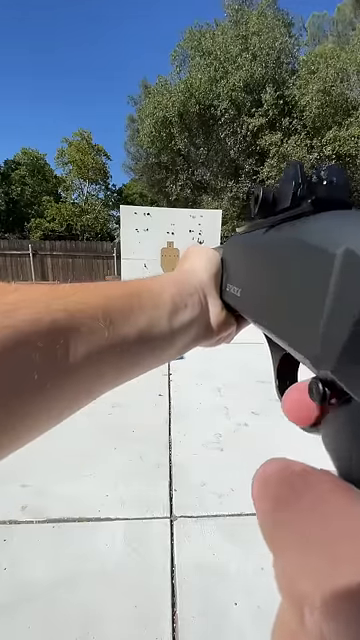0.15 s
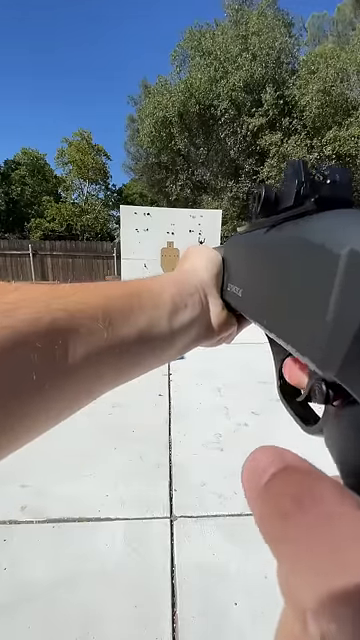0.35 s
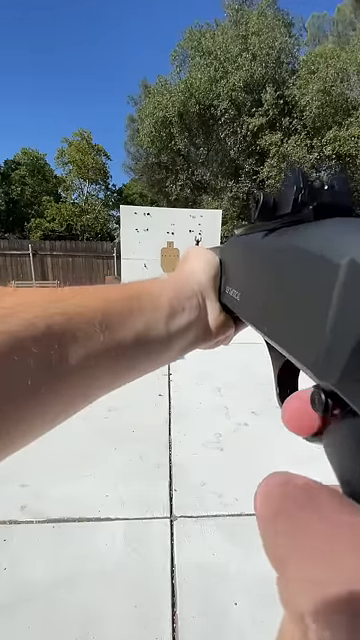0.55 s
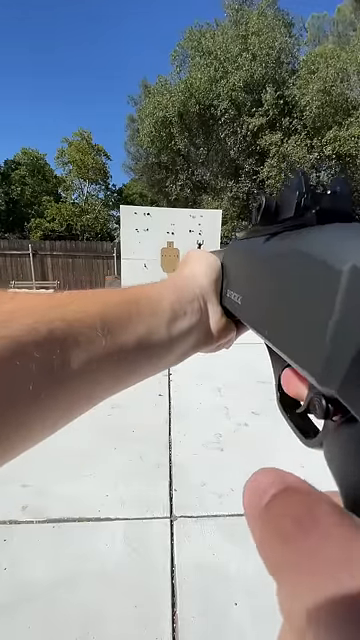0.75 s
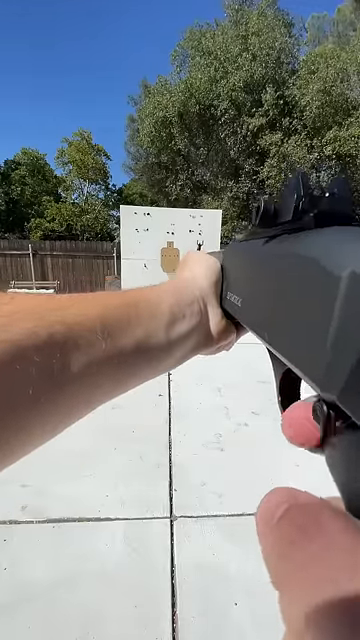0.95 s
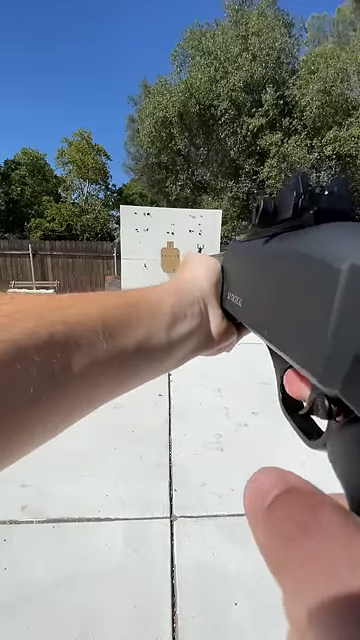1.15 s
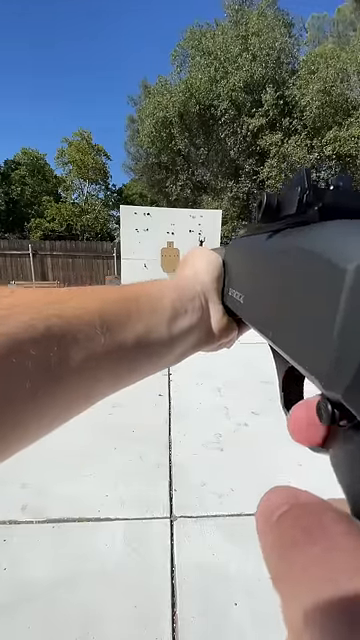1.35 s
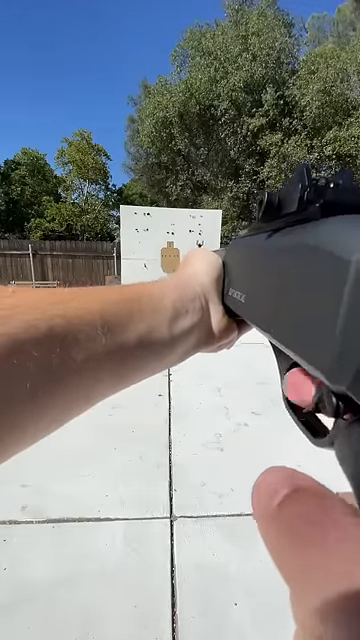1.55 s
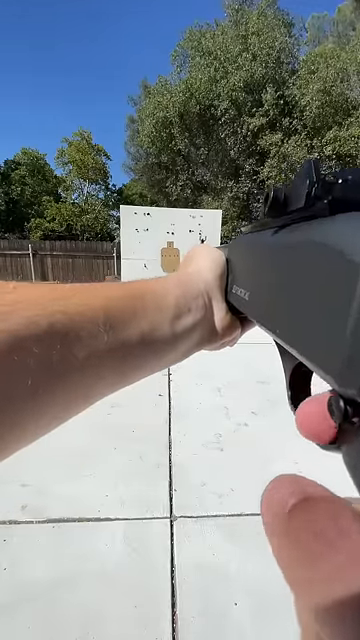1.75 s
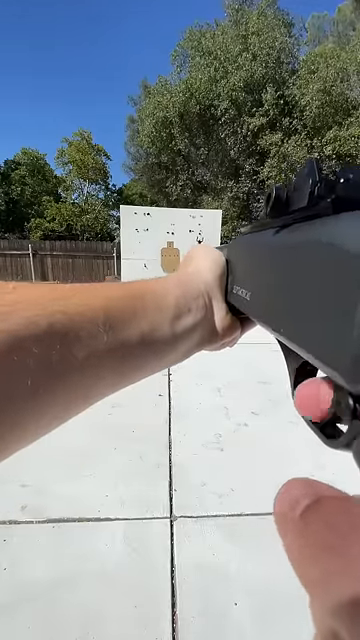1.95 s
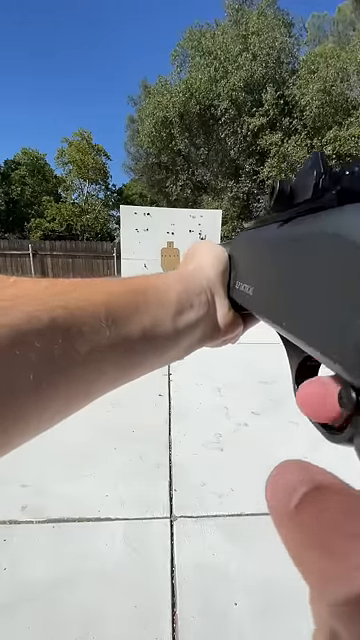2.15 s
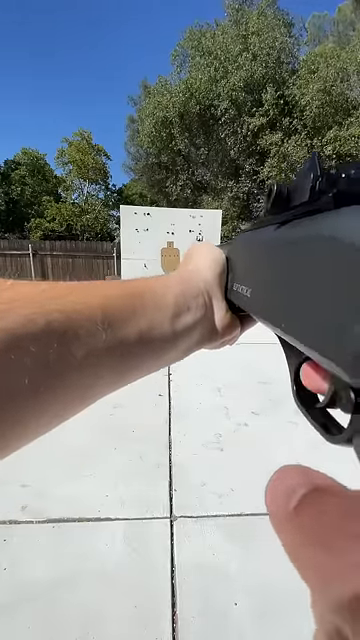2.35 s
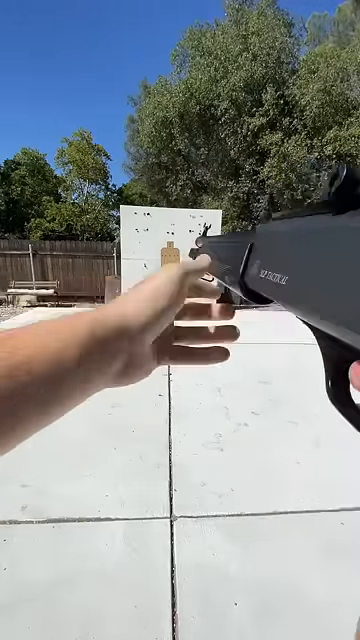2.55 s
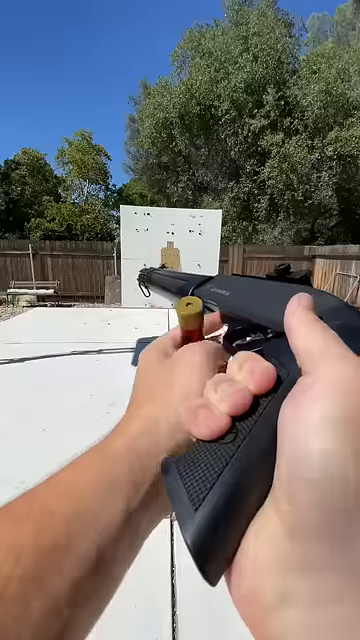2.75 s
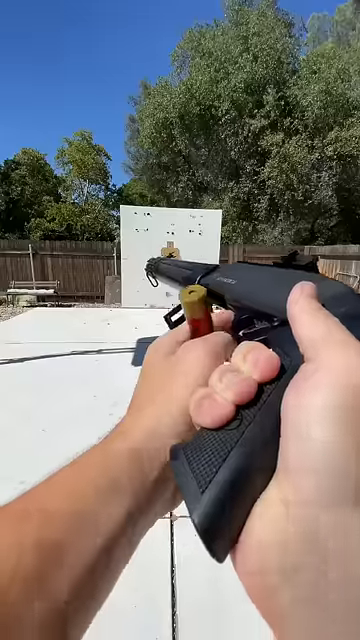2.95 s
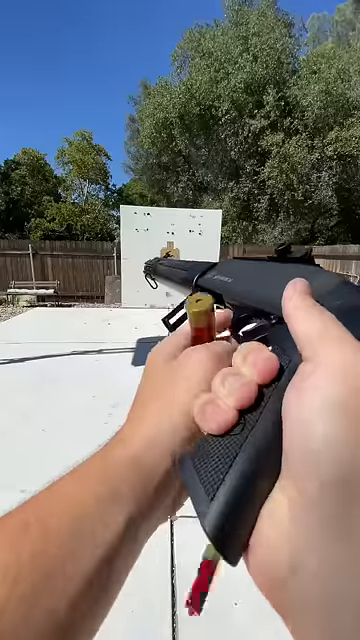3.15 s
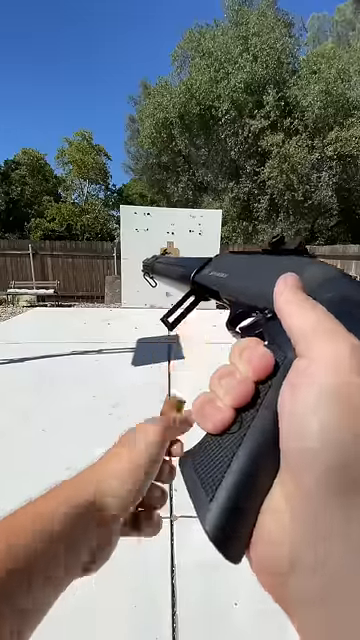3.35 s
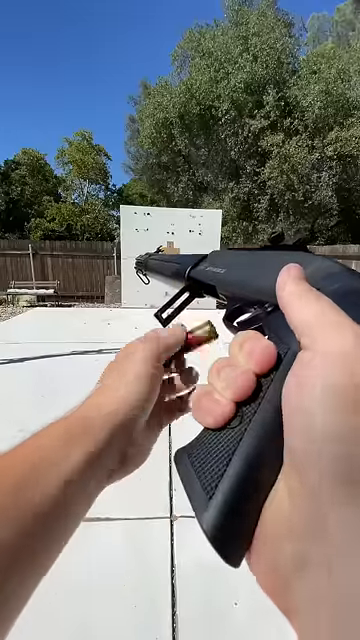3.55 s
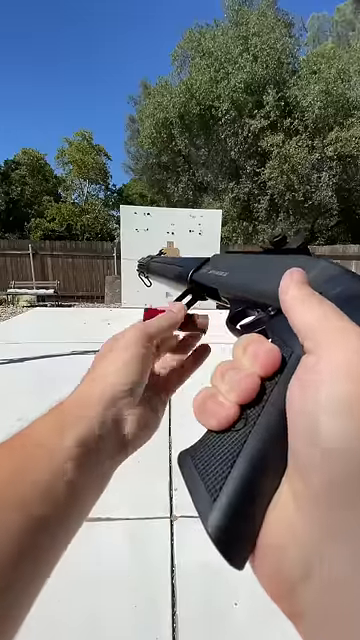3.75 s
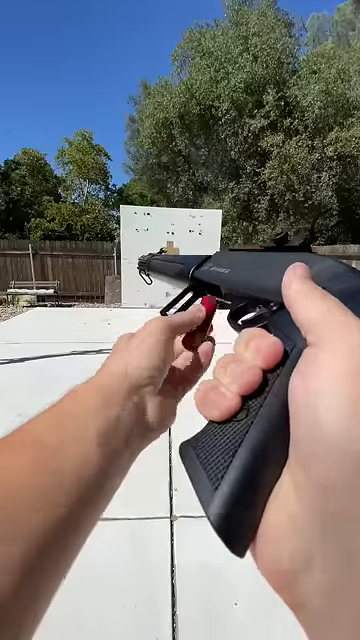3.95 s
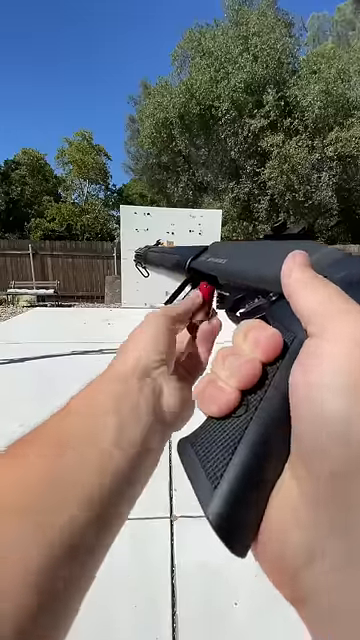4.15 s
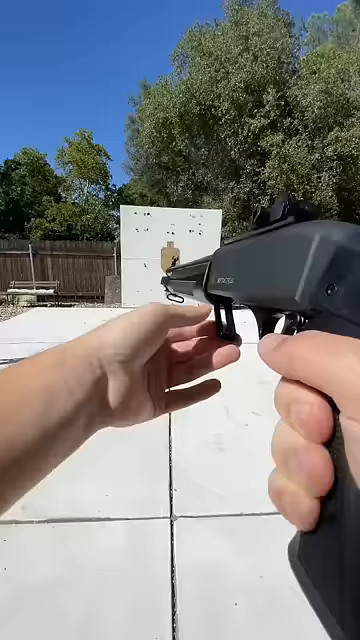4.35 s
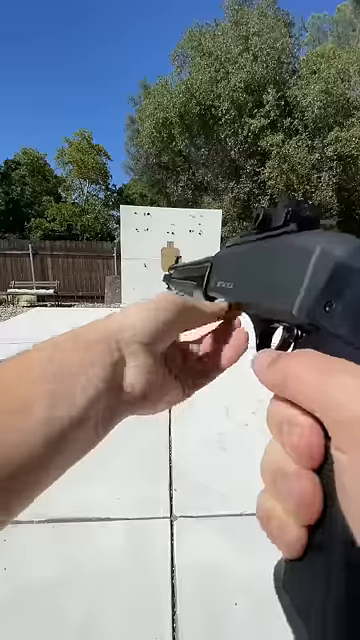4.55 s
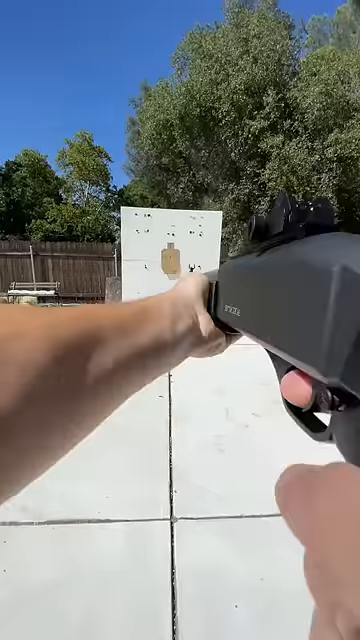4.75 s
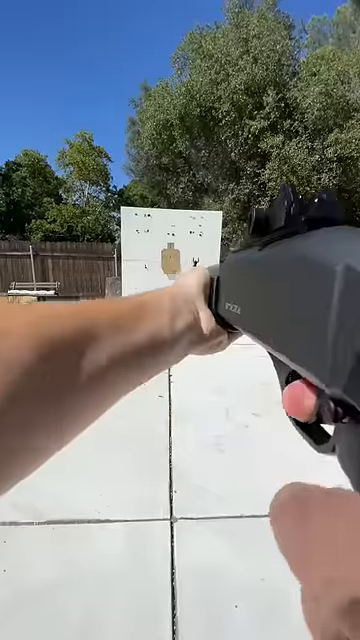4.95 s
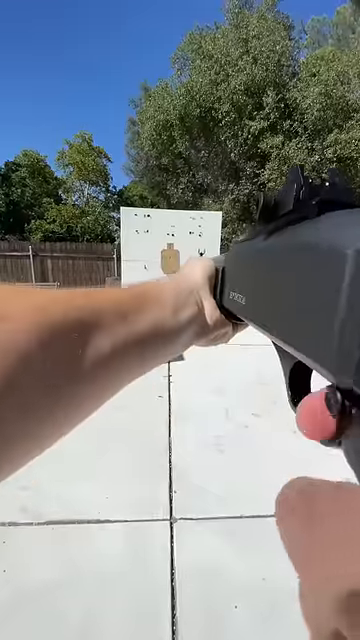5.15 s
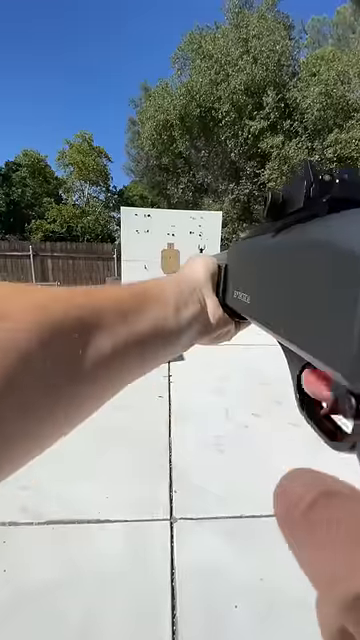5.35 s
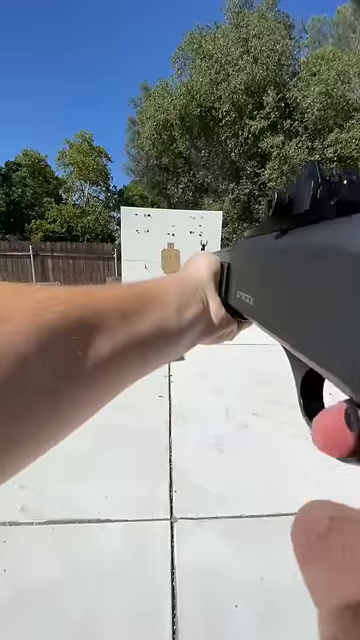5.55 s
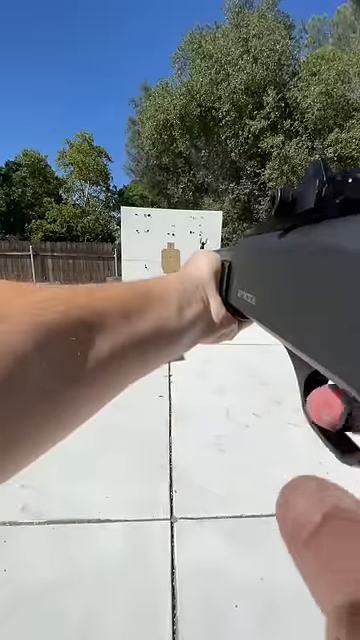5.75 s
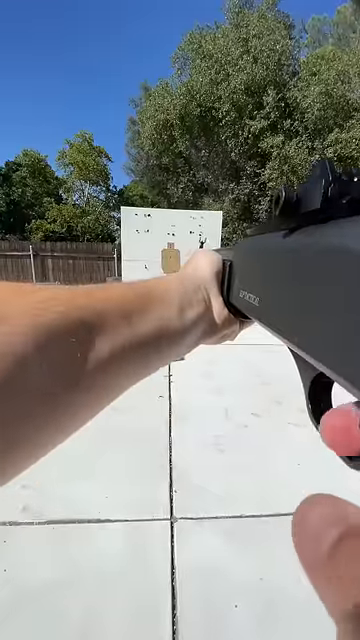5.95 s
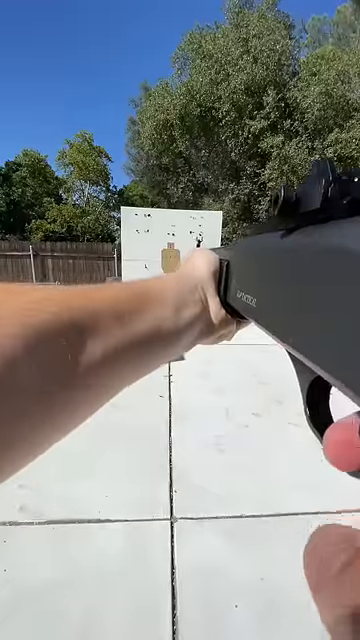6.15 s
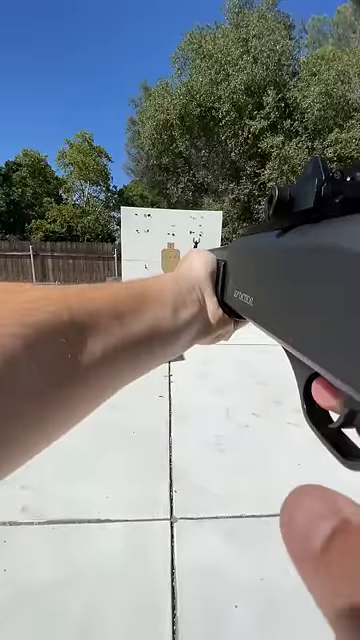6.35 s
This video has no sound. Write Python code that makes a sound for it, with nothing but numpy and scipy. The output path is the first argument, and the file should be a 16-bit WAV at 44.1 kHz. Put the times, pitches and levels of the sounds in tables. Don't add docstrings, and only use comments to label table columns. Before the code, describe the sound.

Outdoors, very close: brisk semi-automatic airsoft shots, each a sharp crack and short puff followed by bolt clatter, a springy trigger snap and a brief fence slap. After six, the last boomier and nearly empty, the gun is lowered and a shell changed with light plastic ticks and taps. Renewed trigger clicks bring five more shots. Low wind, distant traffic and weak hum sit underneath.

```python
import sys
import numpy as np
from scipy import signal
from scipy.fft import rfft, irfft, next_fast_len
from scipy.io import wavfile
from scipy.ndimage import uniform_filter1d, minimum_filter1d

SR = 44100
rng = np.random.default_rng(int(sys.argv[2]) if len(sys.argv) > 2 else 0)


def wav_out(sig):
    wavfile.write(sys.argv[1], SR, np.round(np.clip(np.atleast_2d(sig).T, -1, 1) * 32767).astype(np.int16))


def voltage_ratio(decibels):
    exponent = np.asarray(decibels, float) / 20
    return 10 ** exponent


N = 286650

# start_s, gas_db, hammer_lead_s, action_force_db, loaded (1 pellets, 0 empty)
SHOTS = [(0.17, -7, 0.011, -2, 0.81), (.566, -7, 0.016, -2.5, 0.85), (.945, -8, .012, -3, 0.87),
         (1.318, -6.5, 0.012, -2, 0.73), (1.662, -8.5, 0.013, -1.5, 0.63), (2.024, -1, 0.014, -1.5, 0.094),
         (5.1384, -4.5, .0118, -3, 0.99), (5.504, -5, .0117, -1, 0.88), (5.816, -6, 0.012, -1.1, 0.86),
         (6.135, -7, .012, -1.5, 0.94), (6.484, -9, 0.013, -1.5, 0.71)]
# freq_hz, level_db
PUFF = [(20, -48.5), (45, -12), (110, 2), (220, 4), (380, 1), (700, -4.5), (1500, -17), (4000, -32)]
# freq_hz, density_db_per_hz
CRACK = [(1470, -8.5), (2500, -11), (3090, 4.5), (3340, -8), (4200, -5.5), (5320, -5), (6580, -4),
         (8260, -4), (9010, -1.5), (9670, -5.5), (11000, 0), (11900, -12), (15100, -26), (16400, -48.5)]
# freq_hz, width_hz, level_db
CLACK = [(1124, 120, 1.5), (1835, 1450, 1.5), (2576, 413, 3.5), (3060, 100, 5.5)]
# start_s, crack_db, clack_db
TICKS = [(0.0978, -38.5, -31.5), (0.111, -19.5, -34.5), (0.1158, -16, -32.5), (0.4358, -29.5, -40.5),
         (0.5091, -20.5, -28), (0.5214, -11.5, -33.5), (0.8872, -24.5, -26.5), (0.9041, -15.5, -36.5),
         (0.9264, -13.5, -30.5), (1.242, -40.5, -49), (1.2534, -39.5, -30), (1.272, -14.5, -46.5),
         (1.603, -16, -46.5), (1.961, -34.5, -28.5), (1.985, -16, -25.5), (5.027, -14.5, -30),
         (5.0468, -6.5, -24.5), (5.091, -9.5, -26), (5.355, -26.5, -36.5), (5.3683, -16, -34),
         (5.0989, -14.5, -30.5), (5.1059, -12.5, -30.5), (5.4274, -39.5, -28.5), (5.4399, -11.5, -24.5),
         (5.451, -7, -42), (5.053, -16, -32.5), (1.279, -14, -36.5), (0.1394, -15, -42.5),
         (6.087, -13.5, -35.5), (5.475, -15, -32), (5.759, -7.5, -34.5), (5.7845, -16, -31.5),
         (6.0757, -16.5, -35), (6.111, -13, -29.5), (6.4171, -34, -32), (6.445, -14.5, -39.5),
         (6.464, -15.5, -29)]
# start_s, clack_db, knock_db
SEARS = [(0.3002, -18, -23.5), (0.3115, -18.5, -24), (0.6913, -16, -38.5), (0.7044, -15.5, -30),
         (1.045, -18.5, -22.5), (1.061, -23, -25), (1.4471, -14.5, -27.5), (1.4642, -24, -17.5),
         (1.7877, -21, -17.5), (1.8006, -14, -31), (2.174, -30.5, -48), (2.185, -23, -37),
         (5.2644, -22, -25.5), (5.277, -21.5, -23.5), (5.6255, -22.5, -25), (5.6411, -17.5, -15.5),
         (5.955, -19, -31), (5.9703, -20, -25), (6.2679, -17, -35), (6.2834, -16.5, -33)]
# start_s, level_db
STOPS = [
    (0.375, -16),
    (0.7603, -18),
    (1.521, -16),
    (1.854, -19.5),
    (5.69, -15),
    (6.051, -10),
    (6.3645, -13),
]
# start_s, level_db
SNAPS = [
    (0.326, -11),
    (0.725, -10),
    (1.109, -12.5),
    (1.4741, -10),
    (1.8268, -11),
    (2.1904, -13.5),
    (5.3, -14),
    (5.6554, -12),
    (5.9638, -10.5),
    (6.2925, -10.5),
]
# start_s, length_s, level_db
STROKES = [(0.093, 0.15, -36.5), (0.313, 0.036, -36), (0.494, 0.11, -36.5), (0.709, 0.041, -35),
           (0.894, 0.032, -35.5), (1.093, 0.038, -31.5), (1.071, 0.028, -40.5), (1.253, 0.099, -37),
           (1.458, .035, -34), (1.599, 0.079, -34.5), (1.797, 0.054, -35.5), (1.966, 0.053, -44.5),
           (2.172, 0.045, -41), (2.808, .026, -68), (5.012, .014, -56), (5.424, 0.024, -39.5),
           (5.985, 0.017, -46.5), (2.491, 0.15, -71.5), (2.827, 0.082, -51.5), (4.255, 0.095, -75.5),
           (5.028, 0.026, -45), (5.097, 0.044, -28.5), (5.266, 0.065, -34), (5.355, 0.063, -43),
           (5.438, 0.084, -30.5), (5.632, 0.051, -34.5), (5.748, 0.03, -36), (5.783, 0.07, -34),
           (5.735, .012, -44), (5.948, 0.045, -39), (6.066, 0.1, -35), (6.278, 0.04, -37),
           (6.434, 0.027, -37), (1.293, .012, -30), (2.847, .009, -41.5)]
# freq_hz, level_db, t60_s
TWIST = [(810, -18, .03), (380, -24.5, 0.032)]
# length_s, level_db
BARREL = [(.105, -57), (.1, -57), (.075, -57.5), (0.11, -52), (.1, -49.5), (.01, -80), (.1, -59),
          (.096, -57.5), (0.11, -64), (0.1, -51), (.01, -80)]
# start_s, crack_db, clack_db, knock_db, ring_hz
HATCH = [(2.396, -41.5, -50, -46, 3290), (2.492, -51.5, -68, -58.5, 2300),
         (2.5426, -41, -54.5, -67.5, 4740), (2.6002, -51.5, -73.5, -52.5, 4800),
         (2.4272, -58, -69.5, -71, 5980), (2.9075, -36, -43.5, -36.5, 2870), (2.813, -51, -63.5, -75, 6000),
         (2.8248, -42.5, -63, -66, 6960), (2.8365, -24.5, -59.5, -42.5, 6820),
         (2.8495, -32, -42, -27, 2076), (2.858, -17.5, -34, -50, 2516), (2.8752, -32, -38.5, -52, 2820),
         (2.8924, -21, -38.5, -29, 4030), (2.9134, -27.5, -33, -45, 2956), (2.916, -35, -45, -26, 3960),
         (3.1541, -51, -68.5, -71.5, 5290)]
# start_s, crack_db, clack_db, knock_db, ring_hz
SHELL = [(3.4036, -46, -58, -73.5, 7820), (3.4185, -26.5, -44, -39, 4160), (3.9248, -18, -29, -67, 6230),
         (3.9335, -16.5, -31.5, -49, 6330), (4.0285, -50, -47, -34.5, 2360),
         (4.0964, -37.5, -63.5, -65, 6600), (4.1866, -27, -43.5, -59, 5130),
         (4.1765, -61.5, -67, -71, 6430), (4.3205, -52, -59.5, -68, 6000), (4.2338, -50, -59, -71, 3560),
         (4.2754, -43, -52.5, -47, 5150), (4.3074, -76, -76, -55, 3600), (4.3274, -43.5, -52.5, -66, 3600),
         (4.333, -49, -64.5, -50, 3500), (4.362, -51.5, -61, -70.5, 3500), (4.486, -42.5, -46, -32, 5400),
         (4.4938, -33.5, -34.5, -38, 5320), (4.907, -65, -41, -45.5, 2586),
         (4.9114, -43, -65.5, -33.5, 2340), (4.9458, -48, -56, -65, 3930)]
# freq_hz, level_db, t60_s
RIM_MODES = [(2331, -5, .008), (3187, -14, .006), (4113, -19, .005), (6815, 1, .006), (7354, -3, .006),
             (8312, -10, .005), (11300, 1, .006), (700, -13, .01)]
# start_s, level_db
RIM_TAPS = [
    (3.4126, -29),
    (3.4142, -14),
    (3.4156, -6),
    (3.4168, -20),
]
# start_s, level_db, pitch_hz
THUDS = [(2.836, -42.5, 290.4), (2.864, -36.5, 298.4), (2.895, -37.5, 290), (3.051, -38, 80.04),
         (3.048, -39, 105.6), (3.12, -44, 83.3), (3.702, -41.5, 135.2), (3.921, -43, 207),
         (4.022, -51, 94.9), (4.486, -48.5, 241), (4.641, -42, 74.5), (4.909, -48.5, 463)]
# start_s, length_s, pitch_hz, level_db
RUBS = [
    (2.184, 0.033, 500, -42.5),
    (2.839, 0.074, 840, -48),
    (4.232, 0.0084, 3540, -63),
    (4.326, 0.012, 3630, -66.5),
    (4.03, .008, 1870, -59),
    (4.112, 0.045, 833, -65.5),
    (4.192, 0.015, 860, -63),
    (4.282, 0.04, 860, -58.5),
    (4.325, 0.03, 850, -53),
]
# freq_hz, left_port_lead_rad
PORTS = [(0, 0), (1030, -0.3), (1380, 0.4), (2410, 0.6), (2840, 1.9), (3880, 0.4), (5250, 6.1), (6630, 7.0),
         (7750, 9.0), (9650, 9.2), (12000, 12.5), (13800, 12.7), (15100, 15.7), (16100, 15.6)]
# delay_s, level_db
ECHOES = [(.013, -40), (.0225, -21), (.038, -17), (.054, -36), (.124, -44)]
# freq_hz, t60_s
YARD_DECAY = [(300, 0.21), (1000, 0.058), (3000, 0.14), (5500, 0.35), (9000, 0.42), (11000, 0.3),
              (14000, 0.07)]
# freq_hz, level_db
YARD_COLOUR = [(300, -8), (1000, 7.5), (3000, 0.5), (5500, -11), (7500, -11.5), (9200, -10), (11000, -12),
               (12500, -9.5), (16000, -40.5)]
# freq_hz, density_db_per_hz
AIR = [(18, -38.5), (30, -17), (65, 14), (207, -13), (240, -6), (273, -21.5), (349, -19), (590, -25),
       (792, -25), (996, -33), (1140, -42.5), (1500, -55), (1950, -91), (3300, -120)]
# freq_hz, correlation
AIR_SAME = [(30, 0.66), (60, 0.42), (130, 0.92), (290, 0.99), (640, -0.59), (1410, 0.69), (3100, -0.05),
            (6820, -0.05), (15000, -0.51)]
# time_s, wind_db, traffic_db, leaves_db
BREEZE = [(0, -59.5, -54.5, -50.5), (.12, -61, -53.5, -59.5), (1.901, -62.5, -53.5, -52.5),
          (2.3, -58.5, -61.5, -68.5), (2.62, -61, -70.5, -80.5), (2.9, -53, -53.5, -82),
          (3.109, -53, -63, -79.5), (3.499, -63.5, -67, -85), (4.0, -58.5, -63, -75.5),
          (4.151, -62, -67, -78.5), (4.42, -61, -57, -78), (4.9, -62.5, -55, -75.5),
          (5.06, -60, -53, -69.5), (6.5, -65.5, -50.5, -50.5)]
# freq_hz, level_db
HUM = [(120, -75), (240, -66), (358, -76), (470, -79)]
# freq_hz, density_db_per_hz
LEAVES = [(650, -27), (1100, -7), (2300, -9.5), (4000, -16), (7000, -20), (9300, -37), (10800, -26),
          (12200, -53.5), (15000, -79.5)]
# low_hz, high_hz, sum_time_share, difference_time_share
TOP_BANDS = [(5900, 6500, 1, .6), (7900, 8700, .46, 1), (8700, 9300, .6, 1), (9300, 10200, .4, 1),
             (11600, 12400, .55, .2), (12400, 13600, .35, .1), (13600, 15000, .2, .12),
             (15000, 17500, .08, .08)]

# crack_db, clack_db, hollow_knock_db
HAMMER, VALVE, RECOIL, BOLT = (-3.5, -13.5, -23.5), (-3, -10, -32.5), (-2.5, -7, -20.5), (-7, -11, -17)
TICK, SEAR, SNAP, STOP = (0, 0, -16), (-23.5, 0, 0), (0, -9, -27.5), (-12, -8.5, 0)
BOARD, FENCE_TICK = (-24, -31, -37), (-25.5, -34, -40.5)
SLAM, OPEN_POP, STOP_REBOUND = (-3.5, -11, -11.5), (-30, -9.5, -40.5), (6, 0, -8)

VALVE_S, RECOIL_S, BOLT_S, SLAM_S, REBOUND_S = -.0004, 0.0082, .0245, .0275, .0335
BOARD_S, FENCE_S, BARREL_S = .0655, .0515, .025
STOP_REBOUND_S = .0125
TOUCH_DB, REBOUND_DB, STOP_REBOUND_DB = -3.5, -10, -9
EMPTY_DB = -19.5
ACTION_T60_S, TRIGGER_T60_S, SLAM_T60_S, SHELL_T60_S = 0.039, 0.062, .016, 0.014

PELLET_DB, FENCE_DB, EMPTY_FENCE_DB = -0.5, -30, 10
SWIRL_DB, SWIRL_HZ, SWIRL_T60_S = -9.5, 640, 0.1
BUFFET_DB, BUFFET_HZ = -28.5, 70
BOOM_DB, BOOM_HZ = 18, 59.7

STRIKE_DB, STRIKE_SHARE = -3.5, 1
STOCK_HZ, STOCK_EDGE_HZ, KNOCK_T60_S = 740.7, 566, .015
UPPER_KNOCK_RATIO, UPPER_KNOCK_DB = 3.3, -18
GROAN_DB, GROAN_HZ = -11.5, 433
SPRING_HZ, BARREL_HZ = 4800, 1793

BOUNCES, BOUNCE_S, BOUNCE_GAP_S, BOUNCE_SHRINK_S, BOUNCE_HZ = 5, 2.958, .0432, .0036, 2850
BOUNCE_DB, BOUNCE_LOSS_DB = (-36, -55.5, -41.5), (-6.5, -3, -3.5)
LATCH, LATCH_LOSS_DB = [(2850, -11, .035), (4000, -12, .025)], -5

FACING_DB, HATCH_FACING_DB = 20, -10
GLINT_HZ, GLINT_DB, BODY_DB = 10600, -4.5, -6
SHOULDER_ECHO_DB = -17
YARD_APART, LEAVES_APART = .45, 0.96
MASK_HZ, MASK_DB, MASK_FRAMES = 7500, -23, 9


def read(points, hz):
    f, value = np.transpose(points)
    return np.interp(np.log(hz + 1), np.log(f + 1), value)


def evened(x):
    return x / np.sqrt(np.mean(x ** 2) + 1e-20)


def add(mix, start_s, sound):
    part = mix[..., round(start_s * SR):][..., :sound.shape[-1]]
    part += sound[..., :part.shape[-1]]


def shaped(x, gain):
    size = next_fast_len(x.shape[-1] + min(8192, x.shape[-1]))
    return irfft(rfft(x, size) * gain(np.fft.rfftfreq(size, 1 / SR)), size)[..., :x.shape[-1]]


def resonate(x, hz, width_hz):
    r = np.exp(-np.pi * width_hz / SR)
    return 2 * signal.lfilter([1 - r], [1, -r * np.exp(2j * np.pi * hz / SR)], x + 0j).real


def modes(table, t):
    return sum(voltage_ratio(db - 60 * t / t60_s) * np.sin(2 * np.pi * hz * rng.uniform(.97, 1.03) * t)
               for hz, db, t60_s in table)


def ported(size, apart):
    noise = rng.standard_normal((3, size))
    side = np.array([[.5], [-.5]])
    shared = shaped(noise[2], lambda hz: np.exp(1j * side * read(PORTS, hz)))
    return (shared + apart * noise[:2]) / np.sqrt(1 + apart ** 2)


def parts(rattle, ring_hz, ring_db, small_hz=900):
    crack = shaped(rattle, lambda hz: voltage_ratio(read(CRACK, hz)) / (1 + (small_hz / (hz + 1)) ** 4))
    ring = voltage_ratio(ring_db) * evened(resonate(rattle, ring_hz, 350))
    clack = sum((-1) ** k * voltage_ratio(db) * resonate(rattle, hz, width_hz)
                for k, (hz, width_hz, db) in enumerate(CLACK))
    return evened(crack), ring, evened(clack)


def hits(rows, apart, ring_db, small_hz, contact_db):
    out, rings = np.zeros((2, 2, N))
    t = np.arange(2560) / SR
    for start_s, crack_db, clack_db, knock_db, ring_hz, t60_s in rows:
        both, left, right, slip = rng.standard_normal((4, len(t)))
        knock_hz = STOCK_HZ * rng.uniform(.93, 1.06)
        skew_rad = rng.uniform(-.35, .35)

        burst = (1 - np.exp(-(t / 0.00067) ** 2)) * voltage_ratio(-60 * t / np.clip(t60_s, .004, .1))
        burst *= 1 + voltage_ratio(STRIKE_DB - 60 * abs(t - .0015) / (t60_s * STRIKE_SHARE))
        chatter = voltage_ratio(4.4 * evened(resonate(slip, 0, 750)))
        both[40] += voltage_ratio(contact_db)
        unlike = apart * resonate(np.array([left, right]), 4500, 7400)
        crack, ring, clack = parts((both + unlike) * burst * chatter, ring_hz, ring_db, small_hz)

        turns = knock_hz * (t - 0.7 * 0.0019 * np.exp(-t / 0.00042))
        upper = voltage_ratio(UPPER_KNOCK_DB - 60 * t / 0.0067) * np.sin(2 * np.pi * UPPER_KNOCK_RATIO * turns)
        knock = np.sin(2 * np.pi * turns + [[skew_rad], [-skew_rad]]) + upper
        knock *= voltage_ratio(-60 * t / KNOCK_T60_S) * (1 - np.exp(-t / 0.0023))

        size = voltage_ratio(crack_db + 3.0) / abs(crack).max()
        clack *= voltage_ratio(clack_db - 15.5 - 60 * t / 0.1)
        add(out, start_s - .0009, size * crack + clack + voltage_ratio(knock_db + 13.0) * knock)
        add(rings, start_s - .0009, size * ring)
    return out, rings


def blasts():
    push = np.zeros(N)
    boom = np.zeros(N)
    swirl = np.zeros((2, N))
    t = np.arange(3000) / SR
    click = np.ones(1)
    for start_s, db, lead_s, force_db, loaded in SHOTS:
        add(push, start_s + 0.013, voltage_ratio(db + PELLET_DB + EMPTY_DB * (1.5 - loaded)) * click)
        add(push, start_s + 0.002 - .001 * loaded, voltage_ratio(db) * click)
        back_db = FENCE_DB + EMPTY_FENCE_DB * (1 - loaded)
        add(push, start_s + FENCE_S, voltage_ratio(db + back_db) * np.hanning(40) / 20)
        add(boom, start_s + 0.0018, (1 - loaded) * voltage_ratio(db) * click)
        add(boom, start_s + FENCE_S, (1 - loaded) * voltage_ratio(db + back_db + 4) * click)

        air = rng.standard_normal((3, len(t)))
        air = air[:2] + 3.3 * air[2]
        eddies = evened(resonate(resonate(air, SWIRL_HZ, 650), SWIRL_HZ, 650))
        eddies_db = db + SWIRL_DB + EMPTY_DB / 2 * (2.0 - loaded) - 60 * t / SWIRL_T60_S
        add(swirl, start_s, voltage_ratio(eddies_db) * eddies)
        buffet = evened(resonate(resonate(air[:1], BUFFET_HZ, 60), BUFFET_HZ, 60)) * np.hanning(len(t))
        add(swirl, start_s - .02, voltage_ratio(db + BUFFET_DB - 28.5) * buffet * [[1], [-1]])
    boom = resonate(resonate(boom, BOOM_HZ, 96), BOOM_HZ, 140)
    boom = -voltage_ratio(BOOM_DB) * boom * voltage_ratio([[-4.0], [3.0]])
    gas = voltage_ratio(30.0) * shaped(push, lambda hz: -voltage_ratio(read(PUFF, hz)))
    return gas, swirl + boom


def action():
    rows, slams = [], []
    for start_s, gas_db, lead_s, force_db, loaded in SHOTS:
        kick_db = force_db + EMPTY_DB * (1 - loaded)
        rows += [(start_s - lead_s, *np.add(HAMMER, force_db)),
                 (start_s + VALVE_S, *np.add(VALVE, force_db)),
                 (start_s + RECOIL_S, *np.add(RECOIL, kick_db)),
                 (start_s + BOLT_S, *np.add(BOLT, kick_db + TOUCH_DB)),
                 (start_s + BOARD_S, *np.add(BOARD, kick_db)),
                 (start_s + FENCE_S, *np.add(FENCE_TICK, (force_db + kick_db) / 2)),
                 (start_s, *np.add(OPEN_POP, EMPTY_DB * 2 * loaded)),
                 (start_s + REBOUND_S, *np.add(BOLT, kick_db + REBOUND_DB))]
        slams.append((start_s + SLAM_S, *np.add(SLAM, kick_db), 6000, SLAM_T60_S))
    rows += [(s, *np.add(TICK, (crack_db, clack_db, clack_db))) for s, crack_db, clack_db in TICKS]
    t60s = [ACTION_T60_S] * len(rows)

    rows += [(s, *np.add(SEAR, (0, clack_db, knock_db))) for s, clack_db, knock_db in SEARS]
    for start_s, db in STOPS:
        rebound = np.add(STOP_REBOUND, db + STOP_REBOUND_DB)
        rows += [(start_s, *np.add(STOP, db)), (start_s + STOP_REBOUND_S, *np.add(STOP, rebound))]
    t60s += [TRIGGER_T60_S] * (len(rows) - len(t60s))
    return [row + (rng.uniform(4600, 6300), t60_s) for row, t60_s in zip(rows, t60s)] + slams


def springs():
    return [(s, *np.add(SNAP, db), SPRING_HZ * rng.uniform(.95, 1.1), ACTION_T60_S) for s, db in SNAPS]


def slides():
    out = np.zeros((2, N))
    for start_s, length_s, db in STROKES:
        both, left, right, slip = rng.standard_normal((4, 6000))[:, :round(length_s * SR)]
        chatter = voltage_ratio(5.4 * evened(uniform_filter1d(slip, 110))) * signal.windows.tukey(len(slip), .3)
        crack, ring, clack = parts((both + 0.72 * np.array([left, right])) * chatter, 5000, -12.0)
        add(out, start_s, voltage_ratio(db) * (crack + ring + voltage_ratio(-2.5) * clack))
        groan = evened(resonate(resonate(both * chatter, GROAN_HZ, 490), GROAN_HZ, 490))
        add(out, start_s, voltage_ratio(db + GROAN_DB) * groan)
    return out


def twist():
    out = np.zeros(N)
    t = np.arange(2000) / SR
    for start_s, gas_db, lead_s, force_db, loaded in SHOTS:
        add(out, start_s - lead_s, voltage_ratio(force_db) * modes(TWIST, t))
        add(out, start_s, voltage_ratio(force_db - 6) * modes(TWIST, t))
    return 2 * out


def barrel():
    out = np.zeros(N)
    for (start_s, *_), (length_s, db) in zip(SHOTS, BARREL):
        t = np.arange(0, length_s, 1 / SR)
        tone = np.sin(2 * np.pi * BARREL_HZ * t) * signal.windows.tukey(len(t), .1)
        add(out, start_s + BARREL_S, voltage_ratio(db - 30 * t) * tone)
    return out


def bounces():
    rows = []
    for k in range(BOUNCES):
        start_s = BOUNCE_S + k * BOUNCE_GAP_S - k * (k - 1) / 2 * BOUNCE_SHRINK_S
        rows.append((start_s, *np.add(BOUNCE_DB, np.multiply(BOUNCE_LOSS_DB, k)), BOUNCE_HZ))
    return rows


def reload():
    return [tuple(row) + (SHELL_T60_S,) for row in HATCH + bounces() + SHELL]


def latch():
    out = np.zeros(N)
    t = np.arange(1500) / SR
    blows = [row[:2] for row in HATCH]
    blows += [(row[0], BOUNCE_DB[0] + k * LATCH_LOSS_DB) for k, row in enumerate(bounces())]
    for start_s, db in blows:
        add(out, start_s, voltage_ratio(db) * modes(LATCH, t))
    return out


def drop():
    out = np.zeros(N)
    t = np.arange(1500) / SR
    for start_s, tap_db in RIM_TAPS:
        for hz, db, t60_s in RIM_MODES:
            tone = np.sin(2 * np.pi * (hz * t + rng.random()))
            add(out, start_s, voltage_ratio(tap_db + db - 60 * t / t60_s) * tone)
    return shaped(out, lambda hz: 1 / (1 + (420 / (hz + 1)) ** 6))


def thumps():
    out = np.zeros(N)
    t = np.arange(3000) / SR
    for start_s, db, hz in THUDS:
        add(out, start_s - .004, voltage_ratio(db + 2.5 - 60 * t * hz / 11.0) * np.sin(2 * np.pi * hz * t))
    return out


def rubs():
    out = np.zeros((2, N))
    for start_s, length_s, hz, db in RUBS:
        noise = rng.standard_normal((2, 8000))[:, :round(length_s * SR)]
        drag = resonate(resonate(noise, hz, 260), hz, 260)
        fade = signal.windows.tukey(drag.shape[1], .5)
        add(out, start_s, voltage_ratio(db) * evened(drag + drag[::-1] * 0.65) * fade)
    return out


def facing(rows):
    out = np.zeros(N)
    for start_s, db, *_ in rows + RIM_TAPS[2:3]:
        hatch_db = HATCH_FACING_DB * (start_s < SHELL[0][0])
        add(out, start_s, voltage_ratio(db + FACING_DB + hatch_db) * np.ones(1))
    edge = np.gradient(out)
    treble = resonate(resonate(edge, 4900, 2300), 7000, 8300)
    glint = voltage_ratio(GLINT_DB) * resonate(out, GLINT_HZ, 900)
    return treble + glint + voltage_ratio(BODY_DB) * resonate(edge, 2800, 1500)


def yard(raised, lowered):
    hz, t, z = signal.stft(ported(SR // 2, YARD_APART), SR, nperseg=256)
    z = z * voltage_ratio(-60 * t / read(YARD_DECAY, hz)[:, None]) * np.clip(t / .045, 0, 1) ** 2
    tail = voltage_ratio(-58.5) * evened(signal.istft(z, SR, nperseg=256)[1])
    fences = np.zeros((2, SR // 6))
    for delay_s, db in ECHOES:
        add(fences, delay_s - .003, voltage_ratio(db - 15) * rng.standard_normal((2, 240)) * np.hanning(240))
    back = signal.fftconvolve((raised + lowered)[None], tail, axes=1)[:, :N]
    sideways = voltage_ratio(SHOULDER_ECHO_DB) * raised + lowered
    back += signal.oaconvolve(sideways[None], fences, axes=1)[:, :N]
    return shaped(back, lambda hz: voltage_ratio(read(YARD_COLOUR, hz)))


def breeze():
    frames, hz = N // 256 + 5, np.fft.rfftfreq(1024, 1 / SR)
    a, b, c, d, patches = rng.standard_normal((frames, 513, 5)).T
    patches = evened(uniform_filter1d(uniform_filter1d(patches, 6, 0), 14, 1))
    same = np.clip(read(AIR_SAME, hz), -1, 1)[:, None]
    left = a + 1j * b
    z = np.array([left, same * left + np.sqrt(1 - same ** 2) * (c + 1j * d)])

    time_s, wind_db, far_db, leaves_db = np.transpose(BREEZE)
    frame_s = np.arange(frames) * 256 / SR
    wind_db = np.interp(frame_s, time_s, wind_db)
    far_db = np.interp(frame_s, time_s, far_db)
    windy = 1 / (1 + (hz[:, None] / 220) ** 4)
    level_db = windy * (wind_db + 2.7 * patches) + (1 - windy) * (far_db + 14.0 + 2.5 * patches)
    z = z * voltage_ratio(read(AIR, hz)[:, None] + level_db - 5.0)
    air = signal.istft(z, nperseg=1024, noverlap=768)[1][:, :N]

    n = np.arange(N)
    waver = voltage_ratio(1.0 * evened(uniform_filter1d(rng.standard_normal(N), 6000)))
    waver *= voltage_ratio(0.21 * np.interp(n / 256, np.arange(frames), far_db + 63.0))
    return air + waver * sum(voltage_ratio(db) * np.sin(2 * np.pi * f * n / SR) for f, db in HUM)


def hiss():
    noise = shaped(ported(N, LEAVES_APART), lambda hz: voltage_ratio(read(LEAVES, hz)))
    time_s, wind_db, far_db, leaves_db = np.transpose(BREEZE)
    return evened(noise) * voltage_ratio(np.interp(np.arange(N) / SR, time_s, leaves_db))


def scene():
    side = np.array([[.5], [-.5]])
    gun = sum(hits(action(), apart=0.59, ring_db=-23.0, small_hz=910, contact_db=13))
    gun = shaped(gun, lambda hz: 1 / (1 + (STOCK_EDGE_HZ / (hz + 1)) ** 8))
    gun += slides() + barrel()
    gun += sum(hits(springs(), apart=1.0, ring_db=-8.5, small_hz=2520, contact_db=14.5))
    near = shaped(gun, lambda hz: np.exp(1j * side * read(PORTS, hz)))

    hands, rings = hits(reload(), apart=1.0, ring_db=-4.0, small_hz=2430, contact_db=7)
    lowered = hands + rings + drop() + latch()
    near += shaped(lowered, lambda hz: np.exp(2j * np.pi * side * hz * 22 / SR))

    gas, swirl = blasts()
    near += voltage_ratio([[-.35], [.35]]) * np.array([gas, np.roll(gas, -4)])
    near += twist() * side + swirl + thumps()
    far = yard(gun.mean(0) + 0.24 * gas, facing(reload()))
    return voltage_ratio([[-.5], [.5]]) * near + far + breeze() + hiss() + rubs()


def thinned(x):
    hz, t, z = signal.stft([x[0] + x[1], x[0] - x[1]], SR, nperseg=256)
    treble = hz > MASK_HZ
    top = (abs(z[:, treble]) ** 2).sum(axis=1)
    loudest = -minimum_filter1d(-top, size=MASK_FRAMES, axis=1)
    kept = np.ones(z.shape)
    kept[:, treble] = (top > loudest * voltage_ratio(2 * MASK_DB))[:, None]
    for low_hz, high_hz, *shares in TOP_BANDS:
        band = (hz >= low_hz) & (hz < high_hz)
        power = uniform_filter1d((abs(z[:, band]) ** 2).sum(axis=1), size=3, axis=1)
        loud = [p >= np.quantile(p, 1 - share) for p, share in zip(power, shares)]
        kept[:, band] *= np.array(loud)[:, None]
    both, apart = signal.istft(z * kept, SR, nperseg=256)[1][:, :N] / 2
    return np.array([both + apart, both - apart])


def band_limit(x):
    return signal.sosfilt(signal.butter(12, 16530, fs=SR, output="sos"), x)


def record(dry):
    turns = 1.4
    chirped = shaped(dry, lambda hz: np.exp(-2j * np.pi * turns * (np.log(hz + 15) - hz / 8000)))
    chirped = shaped(chirped, lambda hz: 1 / (1 + (hz / 14500) ** 16))
    mix = thinned(1.332 * np.tanh(chirped / 1.134))
    return band_limit(mix)


dry = scene()
out = record(dry)
wav_out(out)
```